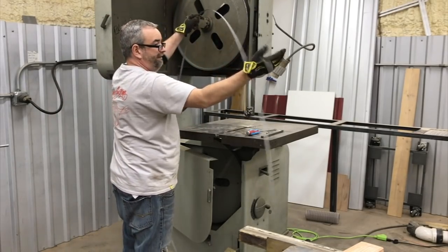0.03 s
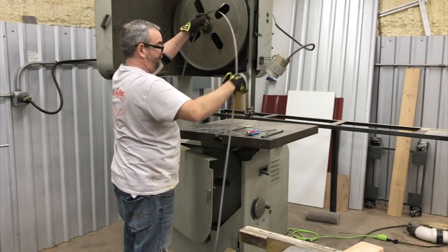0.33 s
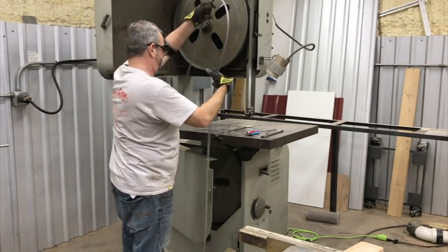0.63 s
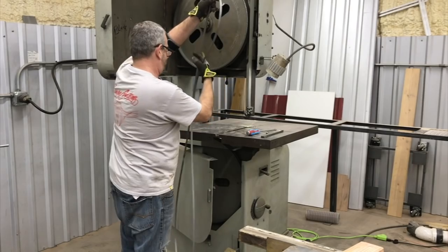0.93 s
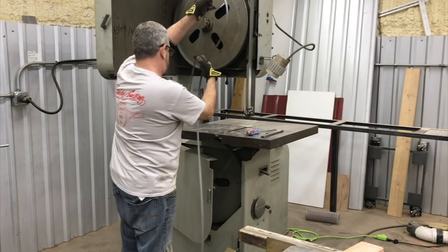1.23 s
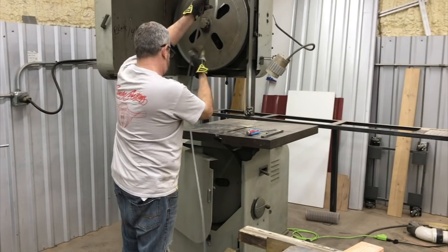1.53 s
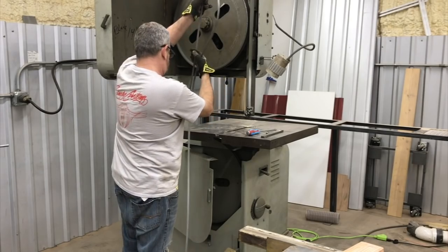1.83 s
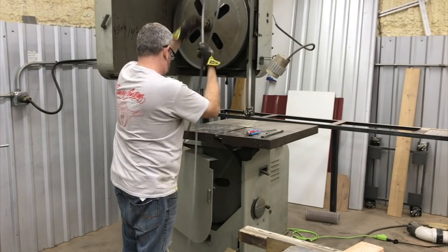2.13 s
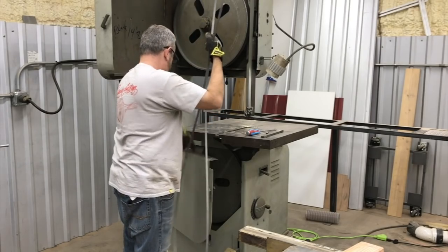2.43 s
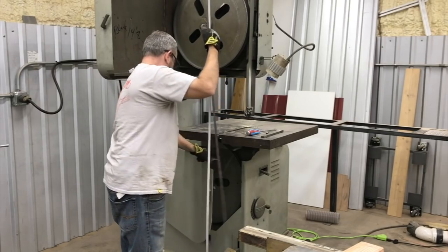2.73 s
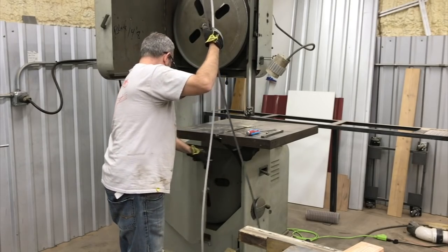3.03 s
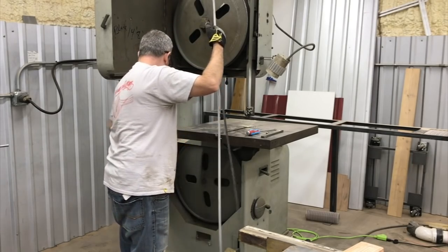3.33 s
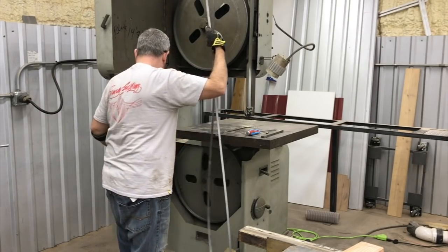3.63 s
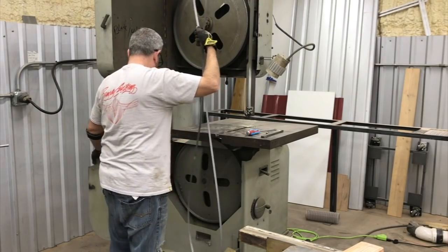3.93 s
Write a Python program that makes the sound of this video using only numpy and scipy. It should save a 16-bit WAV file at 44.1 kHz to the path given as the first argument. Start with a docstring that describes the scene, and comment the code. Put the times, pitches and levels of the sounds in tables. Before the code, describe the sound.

Ringing metal knocks sound as a bandsaw blade is worked onto its wheel, loudest near the start and then sparser. Between them the teeth scrape lightly and the blade swishes, in a quiet workshop with a low rumble and faint hum.

```python
"""A long bandsaw blade is worked onto the upper wheel of an idle saw in a quiet workshop.
Each knock against the machine clatters and rings blade and wheel; a hiss follows the loudest.
Between knocks the teeth scrape along the machine and the moving blade swishes softly.
Behind it: a low room rumble, a wavering hum and a faint pulsing electrical whine."""
import sys
import numpy as np
from scipy import signal
from scipy.fft import rfft, irfft
from scipy.io import wavfile

SR = 44100
rng = np.random.default_rng(int(sys.argv[2]) if len(sys.argv) > 2 else 0)


def wav_record(signal):
    """Record a signal, one row per channel, as 16-bit PCM in the file named by sys.argv[1]."""
    frames = np.transpose(np.atleast_2d(signal))
    bounded = np.clip(frames, -1, 1)
    # unit amplitude maps onto the largest positive 16-bit level
    quanta = np.round(bounded * 32767).astype(np.int16)
    wavfile.write(sys.argv[1], SR, quanta)


N = 176400
TIME = np.arange(N) / SR
FREQS = np.maximum(np.fft.rfftfreq(N, 1 / SR), 1)

# room tone spectrum: f/Hz, level/dB
ROOM_SPECTRUM = [(15, -31), (28, -29), (40, -7), (52, 2), (68, 1.5), (88, -3), (120, -5), (160, -8.5),
                 (220, -14), (300, -20.5), (390, -21.5), (490, -29.5), (750, -28), (1100, -31), (1600, -38),
                 (2300, -43), (4000, -46.5), (7000, -50.5), (10500, -53.5), (12500, -51), (15500, -48.5)]
# rumble gain: t/s, level/dB
RUMBLE_GAIN = [(0, -1.5), (.7, 0), (.9, 2), (1.2, 4), (1.65, -0.5), (2.25, 2), (2.5, 0), (3.25, -3.5),
               (3.55, -4), (4, -6.5)]
# hum envelope: t/s, relative level/dB
HUM_ENVELOPE = [(0.0, -53.5), (1.04, -43.5), (1.41, -53), (1.56, -38.5), (1.7, -51.5), (1.98, -43.5),
                (2.66, -43), (2.7, -51), (2.9, -38), (3.52, -50.5), (3.82, -39), (4.0, -43)]
# steady tones: f/Hz, level/dB
ROOM_TONES = [(59, -52.5), (680, -73), (799, -75)]
# whine bursts per cycle: centre t/s, length/s, level/dB
WHINE_PULSES = [(.0075, 0.0058, -65), (0.0315, .0025, -67)]
# hiss spectrum: f/Hz, level/dB
HISS_SPECTRUM = [(500, 4), (1500, -5), (3200, -3.5), (6000, -5.5), (10500, -9), (15500, -9.5)]
# blade drags: t/s, length/s, level/dB, centre f/Hz, half-width/oct
DRAGS = [(0.907, 0.049, -46, 3000, 0.89), (1.065, 0.072, -58, 2140, 0.21),
         (1.037, 0.079, -62.5, 1400, 0.12), (1.12, 0.15, -68, 2600, 1.6), (2.068, 0.025, -58, 1190, 0.5),
         (3.399, 0.054, -65.5, 3000, 1.05), (3.49, 0.034, -69, 3000, 0.6), (3.72, 0.091, -58.5, 2110, 1.33),
         (3.83, 0.031, -54, 1390, 0.51), (3.901, 0.053, -54, 3170, 1.3), (3.95, .08, -51, 3170, 1.06)]
# room decay: f/Hz, T60/s
ROOM_DECAY = [(300, 0.71), (1200, 0.55), (2500, 0.42), (5500, 0.31), (10000, 0.28), (15000, .23)]
# clatter spectrum: f/Hz, level/dB
CLATTER_SPECTRUM = [(150, 7), (350, 1), (600, -4.5), (1100, -4.5), (1800, -5), (3500, -3), (6200, 0),
                    (7700, -3), (10500, -0.5), (13000, 3.5), (15700, 4)]
# blade modes: f/Hz, level/dB, T60/s
BLADE_RING = [(1105, -22.5, 0.44), (1484, -19.5, 0.27), (1737, -13, 0.16), (2150, -31, 0.52),
              (2357, -23, 0.33), (2890, -16.5, 0.35), (3677, -16.5, 0.29), (3960, -20, 0.42),
              (5800, -22.5, 0.46), (6756, -12, 0.16), (8200, -20, 0.31), (9700, -17, 0.17),
              (10600, -21, 0.17), (12500, -13, 0.11)]
# wheel modes: f/Hz, level/dB, T60/s
WHEEL_RING = [(2510, -15.5, .28), (2730, -16, .28), (3435, -8, 0.33), (3830, -17, 0.33), (4160, -14, 0.33),
              (5443, -10, 0.31), (6500, -12.5, 0.37), (7230, -19, 0.51), (8500, -18, 0.4), (9430, -9, 0.4),
              (12700, -12, 0.21), (15210, -7, .2)]
# blade knocks: t/s, level/dB, treble tilt/(dB/oct), thud/dB, blade ring/dB, wheel ring/dB
KNOCKS = [(0.1159, -34, -0.1, -2, -4, -35), (.3655, -24.5, 1.8, 2.5, -4, -35),
          (.380, -30.5, -1, -3.5, -14, -33), (0.88, -36, -3, -13, -10, -30),
          (1.015, -44.5, -3, -3.5, -10, -32), (1.3085, -38, -1.5, -5.5, -8, -22), (2.310, -41, 0, 4, -8, 0),
          (2.320, -37, 1.4, -12, -20, -20), (2.597, -67, -3, -3, -10, -20), (3.428, -53, 17, -6, -10, -18)]


def from_db(db):
    """Decibels to gain."""
    return 10 ** (np.asarray(db) / 20)


def unit_rms(x):
    """Scale to rms 1."""
    return x / np.sqrt(np.mean(x ** 2) + 1e-20)


def at_hz(points, hz):
    """Table lookup, log frequency."""
    f, value = np.transpose(points)
    return np.interp(np.log(hz), np.log(f), value)


def in_time(points):
    """Table lookup, linear time."""
    return np.interp(TIME, *np.transpose(points))


def coloured(db, source=None):
    """Source (default: white noise) shaped by a spectrum; rms 1."""
    source = rng.standard_normal(N) if source is None else source
    return unit_rms(irfft(rfft(source) * from_db(db), N))


def band_db(centre_hz, half_width_oct):
    """Flat-topped band-pass response."""
    return -10 * np.log10(1 + (np.log2(FREQS / centre_hz) / half_width_oct) ** 4)


def wavering_tone(hz, wander_hz, rate_hz):
    """Sine with random pitch drift; rms 1."""
    drift = coloured(-20 * np.log10(1 + (FREQS / rate_hz) ** 2))
    return np.sqrt(2) * np.sin(2 * np.pi * np.cumsum(hz + wander_hz * drift) / SR)


def decay(t, t60_s):
    """Exponential decay; 1 before t = 0."""
    return np.exp(-np.log(1000) * np.maximum(t, 0) / t60_s)


def workshop(air_db=-42, rumble_top_hz=231):
    """Room tone with swelling rumble, wavering hum and faint steady tones."""
    air = from_db(air_db) * coloured(at_hz(ROOM_SPECTRUM, FREQS))
    rumble = irfft(rfft(air) / (1 + (FREQS / rumble_top_hz) ** 4), N)
    hum = from_db(in_time(HUM_ENVELOPE) - 1) * wavering_tone(hz=104.94, wander_hz=2.36, rate_hz=3.95)
    tones = sum(np.sqrt(2) * from_db(db) * np.sin(2 * np.pi * (hz * TIME + rng.random()))
                for hz, db in ROOM_TONES)
    return air - rumble + rumble * from_db(in_time(RUMBLE_GAIN)) + hum + tones


def whine(cycle_hz=30):
    """High electrical whine: one long and one short burst per cycle."""
    gate = 0
    for centre_s, length_s, db in WHINE_PULSES:
        offset_s = (((TIME - centre_s) * cycle_hz + 0.5) % 1 - 0.5) / cycle_hz
        gate += from_db(db) * np.exp(-(2 * offset_s / length_s) ** 4)
    return gate * wavering_tone(hz=13600, wander_hz=129, rate_hz=300)


def swish(peak_s=2.84, sigma_s=0.29, level_db=-62.5):
    """The moving blade rubs softly, swelling and fading."""
    envelope = np.exp(-((TIME - peak_s) / sigma_s) ** 2 / 2)
    return from_db(level_db) * envelope * coloured(band_db(centre_hz=1010, half_width_oct=0.26))


def hiss(start_s=0.42, rise_s=0.068, stop_s=0.779, fall_s=0.006, level_db=-55.5):
    """Even hiss after the loudest knock; stops short."""
    envelope = np.clip((TIME - start_s) / rise_s, 0, 1) * np.clip((stop_s - TIME) / fall_s, 0, 1)
    return from_db(level_db) * envelope * coloured(at_hz(HISS_SPECTRUM, FREQS))


def scrapes(teeth_per_s=2700, spread_db=9.5, attack_s=0.011, t60_s=0.34):
    """Teeth catch in quick, uneven succession; each drag fades into the room."""
    out, t = np.zeros(N), TIME[:SR // 8]
    for start_s, length_s, db, centre_hz, half_width_oct in DRAGS:
        catches = (rng.random(N) < teeth_per_s / SR) * rng.choice([-1, 1], N)
        force = from_db(spread_db * np.minimum(rng.exponential(1, N), 4))
        body = rng.standard_normal(len(t)) * decay(t, t60_s=0.22)
        grit = coloured(band_db(centre_hz, half_width_oct), signal.fftconvolve(catches * force, body)[:N])
        envelope = np.clip((TIME - start_s) / attack_s, 0, 1) * decay(TIME - start_s - length_s, t60_s)
        out += from_db(db) * envelope * grit
    return out


def ring(modes, t, spread_db=3.6, flutter_depth=0.57, flutter_hz=14):
    """Struck modes, strength random per blow; each flutters as if two close tones were beating."""
    hz, db, t60_s = np.transpose(modes)[:, :, None]
    strength = from_db(db + spread_db * rng.standard_normal(hz.shape))
    rate_hz = flutter_hz * rng.uniform(0.35, 1.94, hz.shape)
    flutter = 1 + flutter_depth * np.sin(2 * np.pi * (rate_hz * t + rng.random(hz.shape)))
    sines = np.sin(2 * np.pi * (hz * t + rng.random(hz.shape)))
    return np.sum(strength * flutter * decay(t, t60_s) * sines, axis=0)


def overtones(n, count=260, spread_db=5.5):
    """Close, inharmonic overtones of the steel band, new per contact point; rms 1."""
    lines = np.zeros(n // 2 + 1, complex)
    position, phase = rng.random((2, count))
    strength = from_db(spread_db * rng.standard_normal(count))
    lines[(position * (len(lines) - 1)).astype(int)] = strength * np.exp(2j * np.pi * phase)
    return unit_rms(irfft(lines, n))


def contact_response(hz, tilt_db_oct, thud_db, thud_top_hz=1190, ripple_db=2.5, ripple_step_hz=110.4):
    """Clatter gain over frequency; broad, damped resonances vary with the contact point."""
    resonances_db = ripple_db * np.interp(hz / ripple_step_hz, np.arange(1024), rng.standard_normal(1024))
    bass_db = thud_db / (1 + (hz / thud_top_hz) ** 4)
    treble_db = tilt_db_oct * np.log2(np.maximum(hz, 1000) / 1000)
    low_cut = hz ** 2 / (hz ** 2 + 100 ** 2)
    return unit_rms(from_db(at_hz(CLATTER_SPECTRUM, hz) + resonances_db + bass_db + treble_db) * low_cut)


def clatter(t, tilt_db_oct, thud_db, overtone_share=0.42, crack_db=1, crack_s=0.0019,
            bounces_per_s=900, bounce_db=3, bounce_fade_s=0.042, room_onset_s=0.0011):
    """Contact crack, early bounces off near surfaces, then a steel and room tail; treble dies first."""
    n = len(t)
    hz = np.maximum(np.fft.rfftfreq(n, 1 / SR), 1)
    response = contact_response(hz, tilt_db_oct, thud_db)
    dense = np.sqrt(overtone_share) * overtones(n) + np.sqrt(1 - overtone_share) * rng.standard_normal(n)
    bounces = unit_rms((rng.random(n) < bounces_per_s / SR) * rng.choice([-1, 1], n))
    early = from_db(bounce_db) * np.exp(-t / bounce_fade_s)
    spectrum = rfft((dense + early * bounces) / np.sqrt(1 + early ** 2)) * response
    crack = from_db(crack_db) * np.exp(-(t / crack_s) ** 2)
    onset = 1 - np.exp(-t / room_onset_s)
    edges_hz = np.r_[0, np.geomspace(400, SR / 2, 13)]
    out = np.zeros(n)
    for lo, hi in zip(edges_hz, edges_hz[1:]):
        band = irfft(spectrum * (hz >= lo) * (hz < hi), n)
        tail = onset * decay(t, at_hz(ROOM_DECAY, (lo + hi) / 2))
        out += band * (crack + tail)
    return out


def knocks():
    """The blade strikes the machine: clatter plus blade and wheel ring."""
    out, t = np.zeros(N + SR), TIME[:SR]
    for start_s, db, tilt_db_oct, thud_db, blade_db, wheel_db in KNOCKS:
        metal = from_db(blade_db) * ring(BLADE_RING, t) + from_db(wheel_db) * ring(WHEEL_RING, t)
        start = int(start_s * SR)
        out[start:start + SR] += from_db(db) * (clatter(t, tilt_db_oct, thud_db) + metal)
    return out[:N]


def scene():
    """Mono sum of all sources."""
    return (knocks() + scrapes() + hiss() + swish() + workshop() + whine())[None]


def record(dry):
    """Steep elliptic low-pass."""
    cutoff_hz = 15800
    return signal.sosfilt(signal.ellip(12, 0.1, 80, cutoff_hz, fs=SR, output="sos"), dry)


dry = scene()
out = record(dry)
wav_record(out)
```